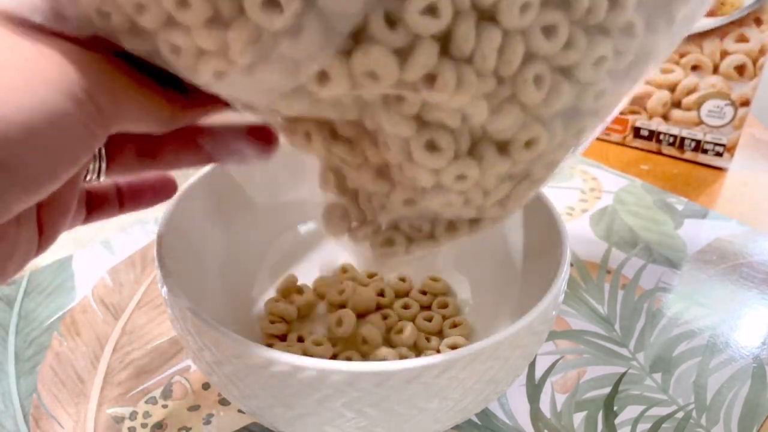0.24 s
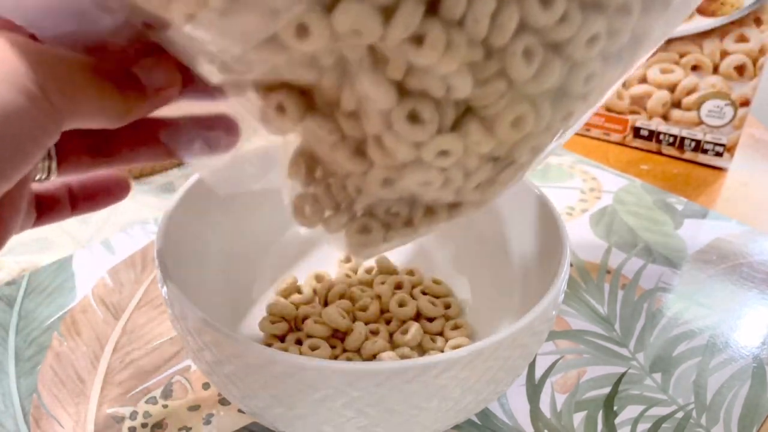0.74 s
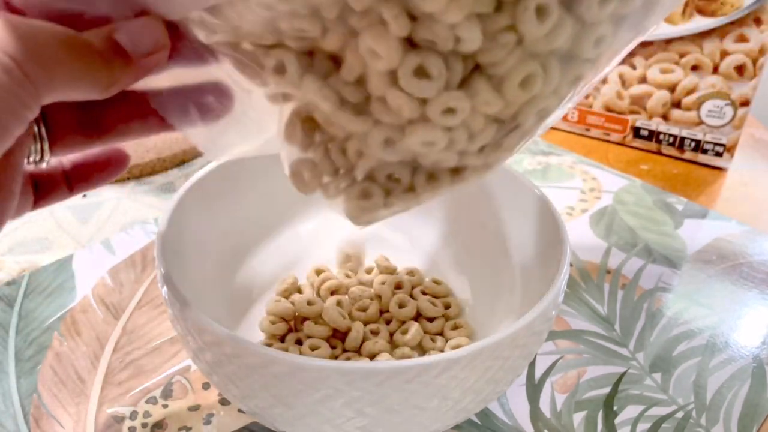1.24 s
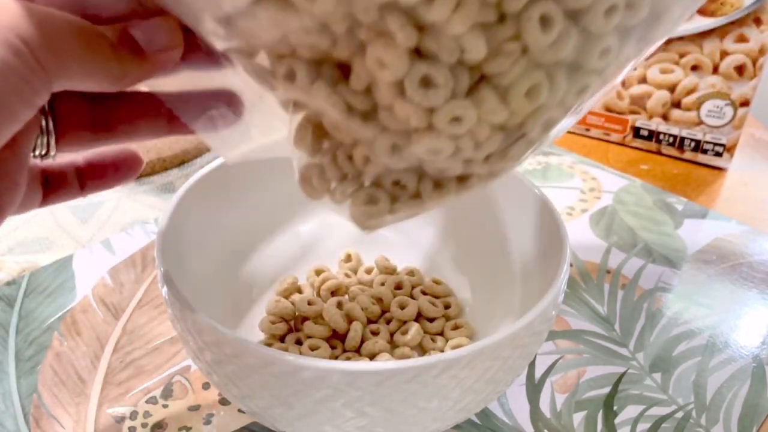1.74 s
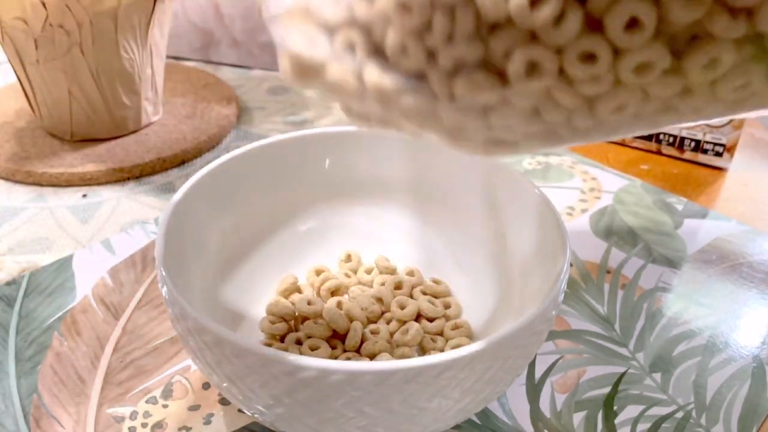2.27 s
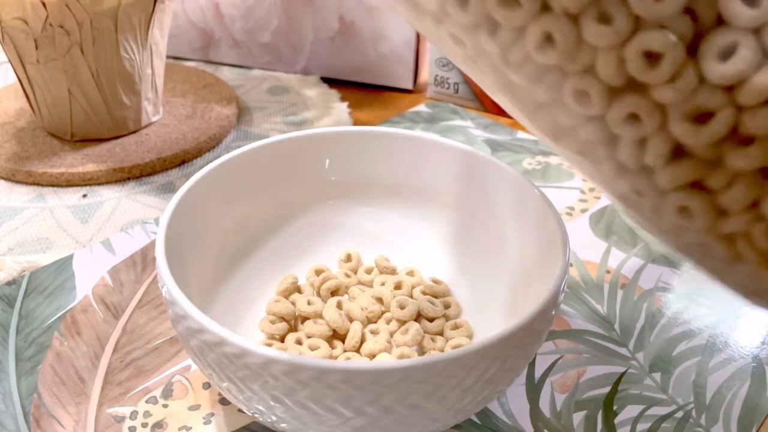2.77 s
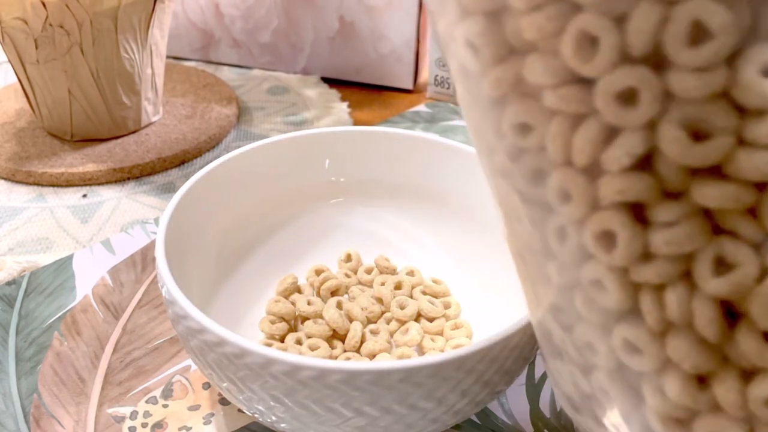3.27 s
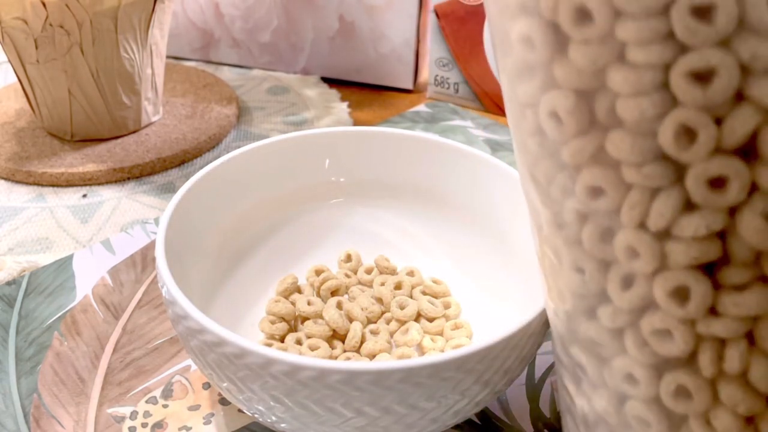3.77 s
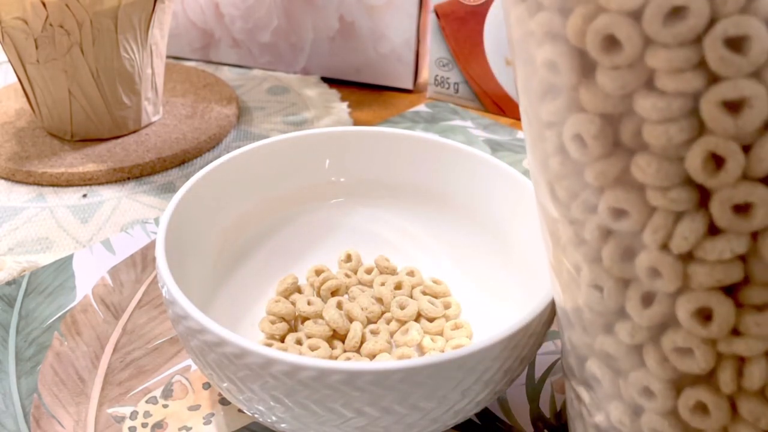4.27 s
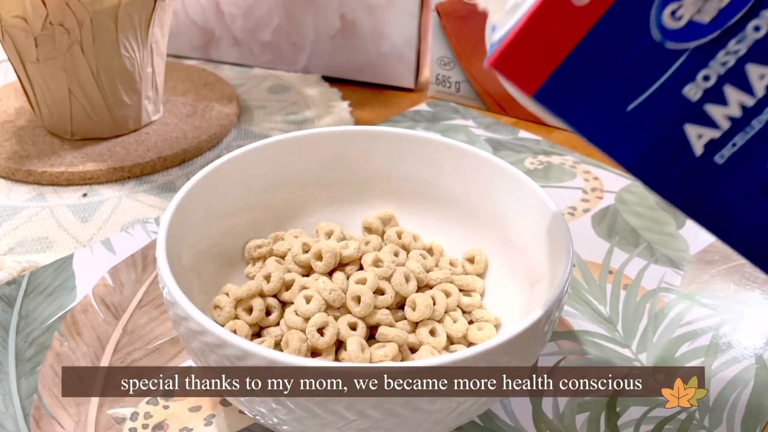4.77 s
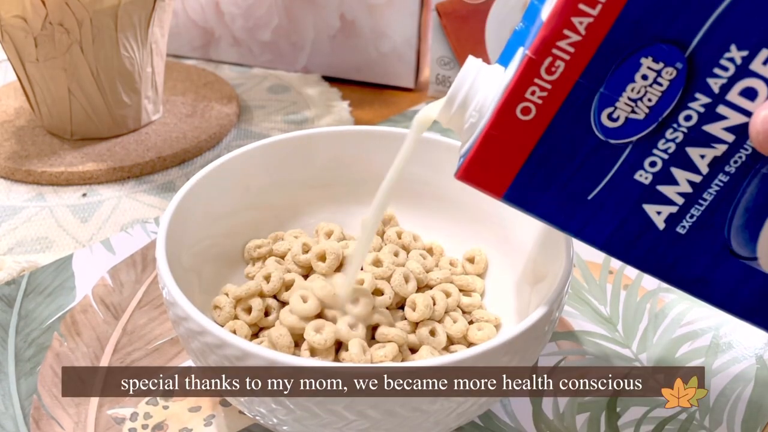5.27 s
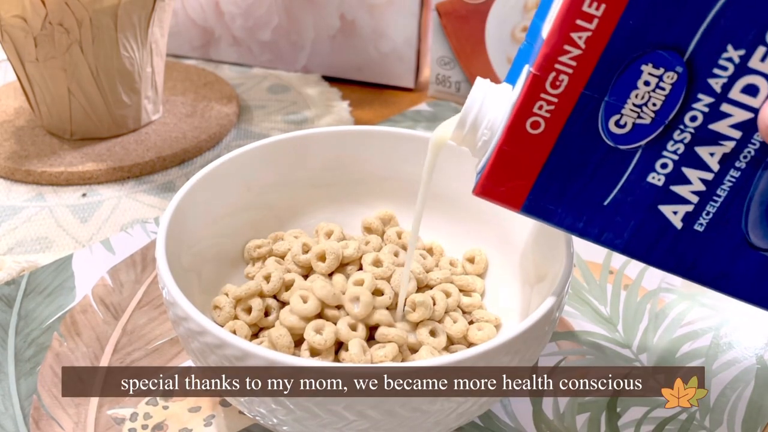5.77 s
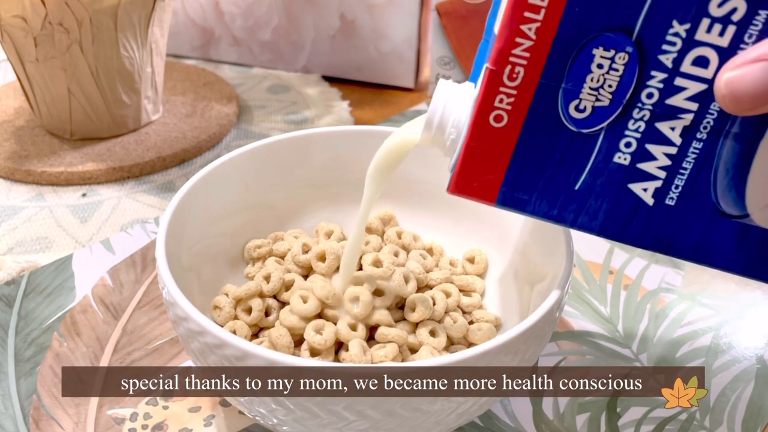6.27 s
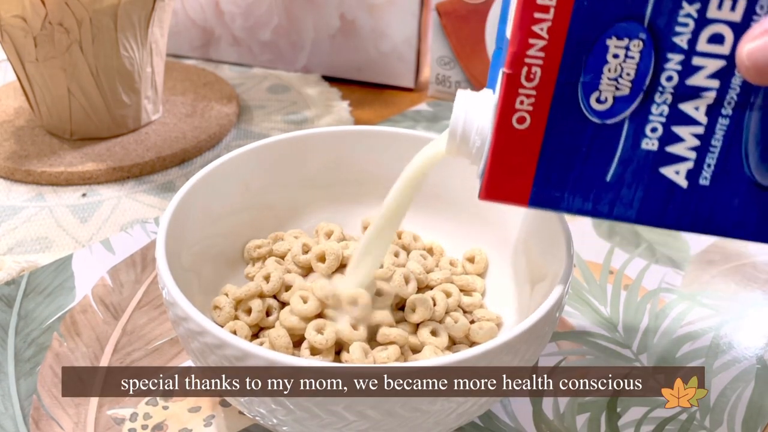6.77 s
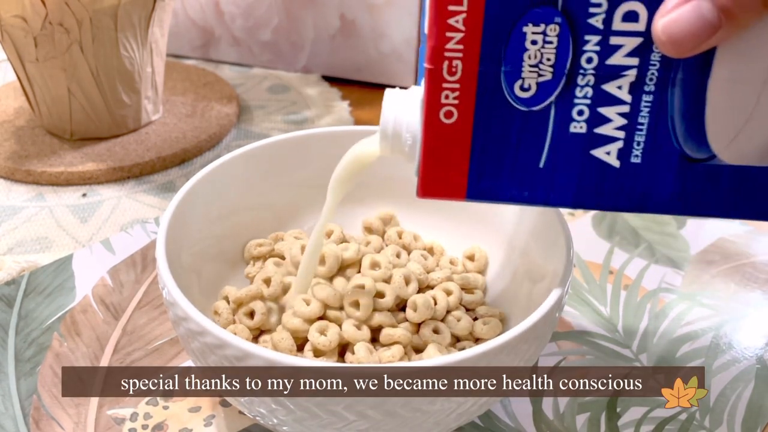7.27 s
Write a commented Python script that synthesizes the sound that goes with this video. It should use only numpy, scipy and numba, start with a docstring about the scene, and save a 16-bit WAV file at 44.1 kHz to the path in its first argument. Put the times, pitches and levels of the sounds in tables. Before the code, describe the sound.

Dry cereal rings rattle in rapid surges from a crinkling plastic bag into a ceramic bowl, then much quieter milk patters and gulps from a carton.

```python
"""Cereal rings rattle in quick surges, about ten a second, from a plastic bag into a ceramic bowl.
The film snaps and flexes, rings ping the bare bowl, then the rest slide back as the bag is stood up.
After a cut, a thin stream of milk patters on the cereal while the carton drones and gulps air.
Close to a phone with two microphones, in a small kitchen. Rings and milk are sums of tiny fading tones,
snaps and drops are short clicks, bowl and carton are struck modes, film and room are coloured noise."""
import sys
import numpy as np
from scipy import signal
from scipy.fft import rfft, irfft
from scipy.io import wavfile
from numba import njit

SR = 44100
rng = np.random.default_rng(int(sys.argv[2]) if len(sys.argv) > 2 else 0)


def wrap_up_sound(samples):
    """Save the sound to the file named by the first command line argument, as 16-bit audio."""
    columns = np.atleast_2d(samples).T
    # keep every value between -1 and 1, then stretch to whole-number steps
    tamed = np.clip(columns, -1, 1)
    steps = np.round(tamed * 32767).astype(np.int16)
    wavfile.write(sys.argv[1], SR, steps)


N = 331632
TIME = np.arange(N) / SR
CUT_S = 4.53  # from the cereal to the milk
TOP_HZ = 15800  # top of the microphones' range
SIDES = np.array([[.5], [-.5]])  # shares a left minus right difference between the channels

# Bag, each shake of the hand throws the rings forward: [t/s, rustle level/dB]
SHAKES = [(0.01, -32), (0.232, -32.5), (0.318, -37.5), (0.401, -32), (0.481, -34), (0.584, -34.5),
          (0.7, -34.5), (0.787, -32.5), (0.886, -33), (0.965, -30.5), (1.059, -36), (1.14, -35.5),
          (1.221, -32.5), (1.304, -34), (1.407, -34.5), (1.499, -32.5), (1.581, -32), (1.671, -33.5),
          (1.756, -44.5), (1.85, -49.5), (2.146, -47.5), (2.199, -47.5)]
SURGE_RISE_S, SURGE_FALL_S = 0.022, 0.026
# Bag, steady sliding as it is tipped, lifted and stood up: [t/s, rustle level/dB]
SLIDE = [(0.0, -35.5), (0.55, -44), (1.0, -38), (1.68, -46.5), (1.82, -51), (2.08, -54), (2.37, -50.5),
         (2.62, -37), (2.91, -34), (3.06, -37), (3.25, -37), (3.33, -32.5), (3.46, -37.5), (3.69, -36.5),
         (3.78, -31), (3.92, -46), (4.23, -54), (4.31, -53), (4.52, -58.5)]
# Place of the bag's mouth: [t/s, 1 = down in the bowl .. 0 = lifted away]
LOWERED = [(1.9, 0.66), (2.4, 0.29)]
# Sharpest snaps of film and landing rings: [t/s, approximate peak level/dB, ring f/Hz, relative treble/dB]
SNAPS = [(0.014, -12.5, 6350, -4), (0.104, -14, 6100, -8), (0.118, -13.5, 2970, -12.5),
         (0.216, -15.5, 1840, -6), (0.398, -10.5, 1350, -3), (0.407, -11.5, 6050, -4),
         (0.464, -17.5, 1051, -28.5), (0.57, -14, 1540, -8), (0.67, -13.5, 1460, -13),
         (0.701, -13.5, 2870, -15), (0.714, -10.5, 1480, -14), (0.771, -13.5, 2620, -14),
         (0.793, -9.5, 1220, -6), (0.852, -14, 2070, -12), (0.86, -15.5, 2740, -10),
         (0.909, -15, 2260, -11), (0.913, -14, 1420, -14), (0.974, -14.5, 4320, -14),
         (1.058, -14, 2690, -17.5), (1.116, -20, 3520, -12), (1.124, -13.5, 3510, -11),
         (1.163, -16.5, 2440, -13), (1.193, -9.5, 1380, -10), (1.319, -14, 1516, -15),
         (1.397, -10, 1320, -8.5), (1.461, -15.5, 1500, -8), (1.511, -11.5, 1300, -11),
         (1.58, -14.5, 3630, -11), (1.683, -15.5, 1600, -7), (1.913, -17, 1288, -17.5),
         (1.984, -25, 790, -43), (2.009, -26.5, 1790, -19), (2.12, -33, 1210, -30),
         (2.136, -19, 810, -17.5), (2.192, -25, 2300, -24), (2.205, -19.5, 5200, -15),
         (2.26, -27, 4860, -18), (2.276, -31, 4650, -19), (2.404, -26.5, 1270, -18),
         (2.459, -20.5, 1710, -13), (2.533, -18.5, 3020, -2), (2.679, -16.5, 1480, -24),
         (2.762, -17.5, 1530, -23.5), (2.845, -17.5, 1450, -10), (3.146, -18, 1060, -2),
         (3.157, -15.5, 1720, -11), (3.213, -21, 2110, -23), (3.318, -19, 1990, -16),
         (3.958, -33, 885, -23), (4.041, -21.5, 1150, -9.5), (4.297, -34.5, 3280, -32),
         (4.368, -29, 2390, -9.5), (4.389, -37, 4570, -9), (4.444, -33.5, 1780, -17.5)]
# Lesser landings around each shake: time scatter, level over the surge, central ring, relative treble
LANDING_SPREAD_S, LANDING_DB, LANDING_HZ, LANDING_TREBLE_DB = .036, 9.5, 1930, -15.5
# A click rebounds once, weaker: typical delay and relative level
BOUNCE_S, BOUNCE_DB = .004, -11
# Bag, its wall buckles: [t/s, peak level/dB, f/Hz]
FLEXES = [(0.239, -23.5, 332), (0.405, -27.5, 375), (.717, -25.5, 288), (0.785, -29.5, 223),
          (1.195, -16.5, 248), (1.567, -28.5, 383), (1.917, -43, 554), (2.137, -33.5, 190),
          (2.207, -39, 140)]
# Bag, the heap slumps inside with a dull surge: [t/s, length/s, level/dB]
HEAVES = [(2.16, .04, -47), (2.615, 0.031, -34.5), (2.935, 0.17, -38), (3.165, 0.05, -36.5),
          (3.395, 0.09, -38.5)]
# Spectrum of rubbing rings: [f/Hz, level/dB]
RUSTLE_SPECTRUM = [(150, -16), (400, -3), (650, 1.5), (1400, 1), (2400, -1.5), (6500, -6), (10000, -11.5),
                   (15000, -21)]
# Spectrum of the burst in every snap, landing and drop: [f/Hz, level/dB]
SNAP_SPECTRUM = [(150, -9.5), (500, -1), (3000, -3), (6000, 5.5), (10000, -1), (15000, -9.5)]
# Spectrum of the bag wall: [f/Hz, level/dB]
BAG_SPECTRUM = [(40, -22), (110, -3), (220, -1), (380, -4.5), (600, -12), (4000, -57)]
# Hollow of the bowl, colouring what sounds inside it: [f/Hz, gain/dB]
HOLLOW = [(190, -0.5), (400, 7.5), (850, -2), (1400, 1), (12000, -6)]

# Bowl, rings strike bare glaze: [t/s, relative level/dB]
PINGS = [(0.015, -26.5), (0.043, -26.5), (0.105, -24.5), (0.142, -28.5), (0.234, -22), (0.27, -26.5),
         (0.346, -26), (0.403, -29), (0.656, -34), (1.276, -32)]
# Bowl, modes of the ceramic: [f/Hz, relative level/dB, t60/s]
BOWL_MODES = [(2110, -20.5, 0.075), (5926, -18, 0.066), (5914, -6.5, 0.06), (10830, -17.5, 0.058),
              (13100, -22, 0.07)]
MODE_SPREAD = .006  # random spread of each mode's pitch, as a share

# Milk, spurts reaching the cereal: [t/s, length/s, level/dB, resonance f/Hz]
SPLASHES = [(5.043, 0.029, -54.5, 785), (5.081, 0.042, -58, 840), (5.218, 0.035, -60.5, 820),
            (5.357, 0.034, -71.5, 2200), (6.46, 0.011, -58, 850), (6.713, 0.1, -66, 902),
            (6.87, 0.046, -60.5, 2800), (7.018, 0.075, -61, 2150), (7.113, 0.086, -62, 1850),
            (7.201, 0.13, -62.5, 1800), (7.454, 0.13, -55, 1990)]
POCKET_DB = -11  # air pockets between the wet rings colour each spurt a little
# Milk, drops and crackles in the wet cereal: [t/s, approximate peak level/dB, ring f/Hz, relative treble/dB]
DROPS = [(5.066, -48, 1730, -8), (5.124, -44, 1910, -7.5), (5.229, -55, 1380, -22), (5.372, -54, 2000, -19),
         (5.981, -63.5, 4030, -27.5), (6.109, -57.5, 4080, -31), (6.19, -61, 2890, -7.5),
         (6.299, -62, 2064, -28.5), (6.52, -55.5, 732, -30), (6.784, -40.5, 840, -14.5),
         (6.915, -35, 1557, -18), (7.07, -46.5, 2520, -13), (7.167, -37.5, 4960, -19),
         (7.265, -37, 2450, -15), (7.465, -47, 1700, -15)]
# Spectrum of the milk on the rings: [f/Hz, level/dB]
PATTER_SPECTRUM = [(450, -9.5), (800, -1), (2000, -2), (3600, -6), (6000, -6), (15000, -26)]
# Carton, the flow makes it drone: [t/s, relative level/dB]
OUTFLOW = [(6.3, -76), (6.58, -65), (6.7, -56), (6.92, -55.5), (7.1, -62.5), (7.5, -56.5)]
# Carton, low murmurs of milk shifting as it is tipped: [t/s, length/s, level/dB]
MURMURS = [(4.82, 0.07, -66), (5.14, 0.13, -66.5), (5.37, 0.065, -64.5), (5.87, 0.12, -66)]
# Spectrum of the carton's drone: [f/Hz, level/dB]
DRONE_SPECTRUM = [(30, -11.5), (60, -3), (108, 3.5), (245, -5), (290, -10), (2000, -54.5)]
# Air drawn through the spout keeps the carton humming
HUM_HZ, HUM_Q, HUM_DB = 243, 19, -3
# Carton, gulps of air: [t/s, level/dB, bubble f/Hz]
GULPS = [(6.596, -39, 115), (6.902, -44.5, 130), (7.326, -34.5, 287.4)]
# Carton, modes of its hollow body: [f/Hz, relative level/dB, t60/s]
CARTON_MODES = [(147, -3, 0.14), (242.5, -3.5, 0.21), (331, -1.5, 0.058), (432, -8.5, 0.11),
                (582, -6.5, 0.051), (690, -4, 0.036)]
# Bowl, faint ring as the pour begins: [f/Hz, level/dB, t60/s]
RIM_MODES = [(1180, -66.5, 0.39)]
RIM_S = 5.125

# Spectrum of the kitchen air: [f/Hz, level/dB]
KITCHEN_SPECTRUM = [(28, -13), (70, 3.5), (243, -7.5), (488, -21), (5720, -43), (11000, -45), (15000, -61)]
KITCHEN_DB = -65.5
# Difference between the phone's two microphones: [f/Hz, side minus mid level/dB]
WIDTH = [(60, -12), (300, -9.5), (650, -4.5), (5500, -5.5), (8000, -16.5), (15000, -28.5)]
# Microphone pair: [f/Hz, gain/dB, left minus right level/dB, phase lead of the left/rad]
PORTS = [(300, 1, -0.8, 0), (3000, 0.5, 2, 0.2), (5200, 0, 2, 0.4), (6200, 0.5, 2, -0.4),
         (7700, 2, -0.5, -3), (10400, 3, -0.7, -5.4), (12600, 1, -0.7, -6.7), (15300, 10, -0.5, -9.8)]


def amp(db):
    """Decibels to gain."""
    return 10 ** (np.asarray(db) / 20)


def curves(table):
    """The columns of a control table at every sample."""
    s, *columns = np.transpose(table)
    return [np.interp(TIME, s, column) for column in columns]


def unit(x):
    """Scale to rms 1."""
    return x / np.sqrt(np.mean(x ** 2))


def noise():
    """Two independent channels of white noise."""
    return rng.standard_normal((2, N))


def add(track, s, sound):
    """Mix a sound into a track from time s on."""
    i = max(int(s * SR), 0)
    track[..., i:i + sound.shape[-1]] += sound[..., :N - i]


def colour(x, points, size=4096):
    """Causal minimum-phase filter through (Hz, dB) points."""
    hz, db = np.transpose(points)
    grid = np.maximum(np.fft.rfftfreq(size, 1 / SR), 1)
    gain_db = np.interp(np.log(grid), np.log(hz), db)
    # folding the cepstrum forward makes the response causal
    cepstrum = irfft(np.log(amp(gain_db)))
    cepstrum[1:size // 2] *= 2
    cepstrum[size // 2 + 1:] = 0
    response = irfft(np.exp(rfft(cepstrum)))
    return signal.oaconvolve(x, response[None], axes=-1)[:, :x.shape[-1]]


def resonance(x, hz, q):
    """A steep band-pass, scaled to rms 1."""
    b, a = signal.iirpeak(hz, q, SR)
    once = signal.lfilter(b, a, x)
    return unit(signal.lfilter(b, a, once))


def spread(pair):
    """Turn a mid and a side signal into left and right."""
    mid, side = pair[:1], colour(pair[1:], WIDTH)
    return mid + np.array([[1], [-1]]) * side


def walk(per_s):
    """Smooth, bounded random wavering with a spread near 1."""
    knots = rng.uniform(-2, 2, 2000)
    return np.interp(TIME * per_s, np.arange(len(knots)), knots)


def swells(table):
    """A smooth rise and fall of gain for each row (s, length s, dB)."""
    total = np.zeros(N)
    for s, length_s, db in table:
        total += amp(db) * np.exp(-np.minimum((2 * (TIME - s) / length_s) ** 2, 50))
    return total


def ring(modes, t):
    """Fading modes after one blow, with slightly random balance and pitch."""
    total = np.zeros(len(t))
    for hz, db, t60 in modes:
        gain = amp(db + 2 * rng.standard_normal())
        varied_hz = hz * rng.normal(1, MODE_SPREAD)
        total += gain * np.sin(2 * np.pi * varied_hz * t) * np.exp(-np.log(1000) * t / t60)
    return total


@njit
def chime(starts, hz, decay_s, sizes, glide):
    """Sum many short fading tones; each rises by the share glide of its pitch per decay time."""
    out = np.zeros((2, N))
    for k in range(len(starts)):
        step, life = 2j * np.pi * hz[k] / SR, decay_s[k] * SR
        z, p, bend = 1 + 0j, np.exp(step - 1 / life), np.exp(step * glide / life)
        for i in range(starts[k], min(starts[k] + int(5 * life), N)):
            out[0, i] += sizes[k, 0] * z.real
            out[1, i] += sizes[k, 1] * z.real
            z *= p
            p *= bend
    return out


def grains(per_s, scatter_db, ring_s, smear_s, count, glide=0):
    """Countless tiny contacts, few of them strong, each of count modes that ring ring_s at 1 kHz, less above."""
    starts = np.flatnonzero(rng.random(N) < per_s / SR)
    sizes = amp(scatter_db * np.minimum(rng.exponential(size=len(starts)), 3.5))
    pitch, late = rng.random((len(starts) * count, 2)).T
    hz = (np.sqrt(300) + pitch * (np.sqrt(TOP_HZ) - np.sqrt(300))) ** 2
    damping = np.sqrt(hz / 1000)
    weights = rng.standard_normal((len(hz), 2)) * (np.repeat(sizes, count) * damping)[:, None]
    mode_starts = np.repeat(starts, count) + (late * smear_s * SR).astype(int)
    return chime(mode_starts, hz, ring_s / damping, weights, float(glide))


def clicks(table, rise_s, decay_s, ring_s, ring_gain, skirt_db, skirt_s, treble_db, bass_db, size=1024):
    """Each click is a burst and a ring with two overtones, a weaker, longer burst around it, and one rebound."""
    out, t = np.zeros((2, N)), (np.arange(size) - size // 4) / SR
    away = np.maximum(t - rise_s, 2 * (rise_s - t))  # twice as quick to build as to fade
    envelope = np.exp(-away / decay_s) + amp(skirt_db) * np.exp(-away / skirt_s)
    for s, db, hz, bright_db in table:
        burst = colour(rng.standard_normal((2, size)) * envelope, SNAP_SPECTRUM, size=512)
        tone = np.zeros((2, size))
        for f in hz * np.cumsum([1, *rng.uniform(.5, 2.5, 2)]):
            phase = rng.uniform(0, 2 * np.pi, (2, 1))
            tone += (f < TOP_HZ) * np.sqrt(hz / f) * np.sin(2 * np.pi * f * t + phase)
        click = unit(burst) + ring_gain * unit(tone * np.exp(-away / ring_s))
        # thin below its pitch, tilted above
        knee_hz, tilt_db = min(hz, 2500), bright_db + treble_db
        tilt = [(knee_hz / 2, bass_db), (knee_hz, 0), (6000, tilt_db), (14000, 2 * tilt_db)]
        click = colour(click, tilt, size=512)
        # a click this short peaks about ten times over its rms
        click = amp(db) * unit(click) / 10
        add(out, s + t[0], click)
        add(out, s + t[0] + BOUNCE_S * (.5 + rng.random()), amp(BOUNCE_DB) * click)
    return out


def flow(uneven_db=0.8, uneven_per_s=22):
    """Level of the moving rings in dB: a slightly uneven slide plus one surge for each shake."""
    power = amp(curves(SLIDE)[0] + uneven_db * walk(uneven_per_s)) ** 2
    for s, db in SHAKES:
        age = (TIME - s) / np.where(TIME < s, SURGE_RISE_S, SURGE_FALL_S)
        power = power + amp(db) ** 2 * np.exp(-np.minimum(age ** 2, 50))
    return 10 * np.log10(power)


def landings(scatter_octaves=0.53, treble_scatter_db=3, count=2):
    """Rows of lesser clicks, count around each shake, each of a different ring."""
    rows = []
    for s, db in count * SHAKES:
        late, pitch, bright = rng.standard_normal(3)
        rows.append((s + LANDING_SPREAD_S * np.tanh(late), db + LANDING_DB,
                     LANDING_HZ * 2 ** (scatter_octaves * pitch),
                     LANDING_TREBLE_DB + treble_scatter_db * bright))
    return rows


def rings_and_film(flow_db, lowered):
    """Rings tumble from the mouth or slide inside, as many tiny contacts; creases of the film flip."""
    tumbling = grains(per_s=460, scatter_db=2.1, ring_s=.0032, smear_s=.0007, count=18)
    sliding = grains(per_s=1600, scatter_db=2.1, ring_s=.0028, smear_s=.0015, count=12)
    rustle = np.sqrt(lowered) * unit(colour(tumbling, RUSTLE_SPECTRUM))
    rustle += np.sqrt(1 - lowered) * unit(colour(sliding, RUSTLE_SPECTRUM))
    # thin and bright, softer once the bag is lifted
    creases = grains(per_s=57, scatter_db=1, ring_s=.0008, smear_s=0.00024, count=10)
    crinkle = unit(colour(creases, [(800, -6.5), (4000, 8.5), (15000, -1.5)]))
    return (rustle + amp(-15 + 2 * lowered) * crinkle) * amp(flow_db)


def bag_wall(flow_db, lowered, rumble_db=-19, rumble_share=0.69, grip_db=2, handling_db=-55):
    """The wall rumbles with the flow, but swings less in level; handling and slumps add low noise."""
    level_db = rumble_share * flow_db + rumble_db + grip_db * lowered  # the pouring grip adds to it
    rumble = unit(colour(noise(), BAG_SPECTRUM)) * amp(level_db)
    handling = amp(handling_db) * resonance(noise(), hz=73, q=1.1)
    slumps = swells(HEAVES) * resonance(noise(), hz=203, q=1.0)
    return rumble + handling + slumps


def bag(flex_s=0.0031, left_db=2):
    """Rings, film and wall, with snaps and buckling, heard through the bowl's hollow while lowered."""
    flow_db, lowered = flow(), np.clip(curves(LOWERED)[0], 0, 1)
    out = rings_and_film(flow_db, lowered) + bag_wall(flow_db, lowered)
    out += clicks(SNAPS + landings(), rise_s=0.0012, decay_s=0.0007, ring_s=.0012, ring_gain=0.45,
                  skirt_db=-24, skirt_s=0.005, treble_db=11.5, bass_db=-3)
    t = TIME[:SR // 10]
    swell = 2 * t / flex_s * np.exp(1 - 2 * t / flex_s)
    for s, db, hz in FLEXES:
        add(out[0], s, amp(db) * swell * np.sin(2 * np.pi * hz * t))
    out = spread(out)
    in_bowl = colour(out, HOLLOW) * amp(SIDES * left_db)
    return lowered * in_bowl + (1 - lowered) * out


def bowl(ping_db=2.5, left_db=5, graze_db=-35, covered_s=0.39, count=14):
    """Rings ping the glaze's modes, and more graze them until cereal covers the bottom."""
    out, t = np.zeros((2, N)), TIME[:SR // 4]
    grazes = [(s, graze_db) for s in rng.uniform(0, covered_s, count)]
    for s, db in PINGS + grazes:
        pair = np.array([ring(BOWL_MODES, t), ring(BOWL_MODES, t)])
        add(out, s, amp(db + ping_db) * pair)
    return spread(out) * amp(SIDES * left_db)


def carton_drone(drone_db=-2):
    """The flow and shifting milk sound a low drone, with a narrow hum of air drawn through the spout."""
    outflow, murmurs = amp(curves(OUTFLOW)[0] + drone_db), swells(MURMURS)
    drone = unit(colour(noise(), DRONE_SPECTRUM)) * (outflow + murmurs)
    hum = resonance(noise(), HUM_HZ, HUM_Q) * (outflow + murmurs / 2)
    return drone + amp(HUM_DB) * hum


def milk_patter(settle_s=0.033):
    """The stream patters on the rings in spurts of tiny bubbles whose pitch rises."""
    bubbles = grains(per_s=1700, scatter_db=2.5, ring_s=.0028, smear_s=0.001, count=10, glide=.03)
    crackle = unit(colour(bubbles, PATTER_SPECTRUM))
    # the milk takes a moment to run off the rings
    keep = np.exp(-1 / (settle_s * SR))
    patter, t = np.zeros((2, N)), TIME[:SR // 3]
    for s, length_s, db, hz in SPLASHES:
        arriving = np.sqrt(np.abs(np.sin(np.pi * t / length_s))) * (t < length_s)
        spurt = signal.lfilter([1 - keep], [1, -keep], arriving)
        contacts = np.roll(crackle, -int(s * SR), axis=1)[:, :len(t)]
        pockets = amp(POCKET_DB) * resonance(contacts, hz, q=2.2)
        add(patter, s, amp(db) * spurt * (unit(contacts) + pockets))
    return patter


def gulps(bubble_s=0.0093, push_s=0.00234, carton_db=-7):
    """Air bubbling into the carton sounds a short low tone and knocks the modes of its hollow body."""
    out, t = np.zeros(N), TIME[:SR // 3]
    soft_push = 1 - np.exp(-t / push_s)
    for s, db, hz in GULPS:
        bubble = np.sin(2 * np.pi * hz * t) * np.exp(-t / bubble_s)
        add(out, s, amp(db) * soft_push * (bubble + amp(carton_db) * ring(CARTON_MODES, t)))
    return out


def milk():
    """Drone, patter and drops in stereo, with the gulps and the faint bowl ring in the middle."""
    out = carton_drone() + milk_patter()
    out += clicks(DROPS, rise_s=0.0019, decay_s=0.0013, ring_s=0.0015, ring_gain=0.77,
                  skirt_db=-16, skirt_s=0.0056, treble_db=8.0, bass_db=-7.5)
    out[0] += gulps()
    add(out[0], RIM_S, ring(RIM_MODES, TIME[:SR // 3]))
    return spread(out)


def room(x, wet_db=-17, t60_s=.22, first_s=.005):
    """The table and the nearby walls add a short, duller tail."""
    t = TIME[:SR // 2]
    tail = rng.standard_normal((2, len(t))) * np.exp(-np.log(1000) * t / t60_s) * (t > first_s)
    tail = colour(tail / np.sqrt(np.sum(tail[0] ** 2)), [(3000, 0), (12000, -7)])
    return x + amp(wet_db) * signal.oaconvolve(x, tail, axes=-1)[:, :N]


def kitchen(waver_db=0.56, waver_per_s=9):
    """Coloured noise for the room's air; its part below 500 Hz wavers softly."""
    air = unit(spread(colour(noise(), KITCHEN_SPECTRUM))) * amp(KITCHEN_DB)
    rumble = signal.sosfiltfilt(signal.butter(2, 500, fs=SR, output="sos"), air)
    return air + rumble * (amp(waver_db * walk(waver_per_s)) - 1)


def fading_rustle(level_db=-72, fade_s=0.15):
    """Dull noise that fades away from the cut."""
    dull = unit(spread(colour(noise(), [(500, 3), (4000, -11), (9000, -34.5)])))
    return dull * amp(level_db) * np.exp(-np.abs(TIME - CUT_S) / fade_s)


def scene():
    """Cereal up to the cut, then a fading dull rustle and the milk; the kitchen lies under both."""
    before = np.clip((CUT_S - TIME) / .003, 0, 1)
    cereal = room(bag() + bowl())
    pour = room(milk()) + fading_rustle()
    return before * cereal + (1 - before) * pour + kitchen()


def record(dry):
    """The two microphone ports colour the sound and turn its phase; the top is cut."""
    hz, *columns = np.transpose(PORTS)
    grid = np.fft.rfftfreq(N, 1 / SR)
    gain_db, left_db, lead = (np.interp(grid, hz, column) for column in columns)
    response = amp(gain_db + SIDES * left_db) * np.exp(1j * SIDES * lead)
    heard = irfft(rfft(dry) * response, N)
    return signal.sosfilt(signal.ellip(8, .2, 80, TOP_HZ, fs=SR, output="sos"), heard)


dry = scene()
out = record(dry)
wrap_up_sound(out)
```